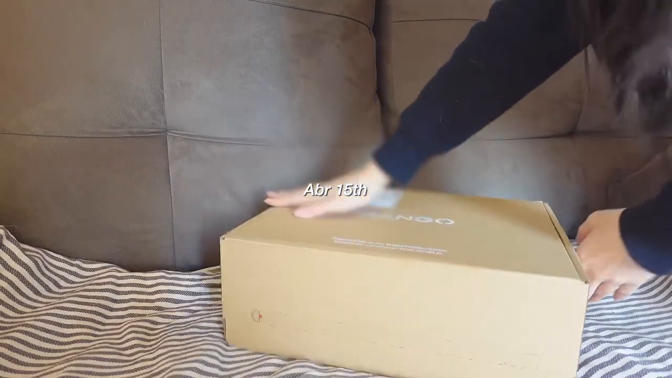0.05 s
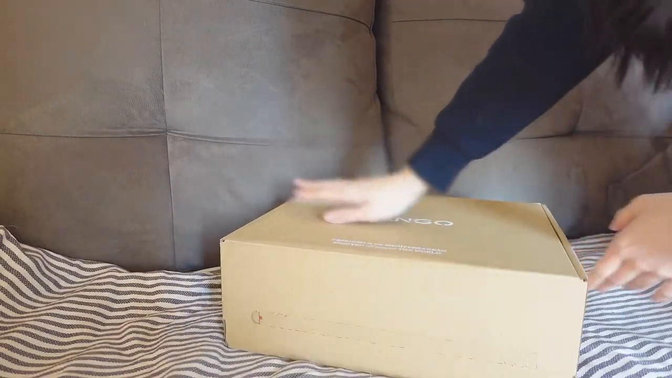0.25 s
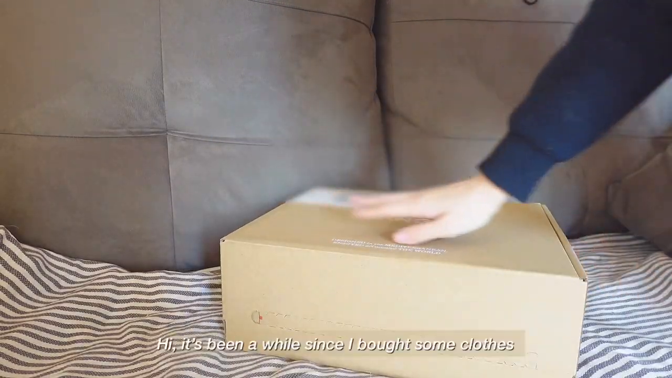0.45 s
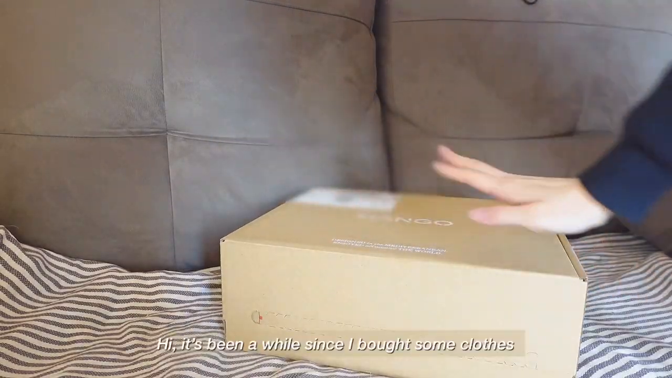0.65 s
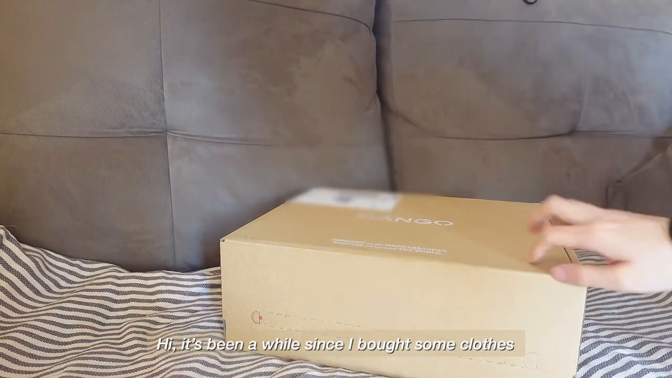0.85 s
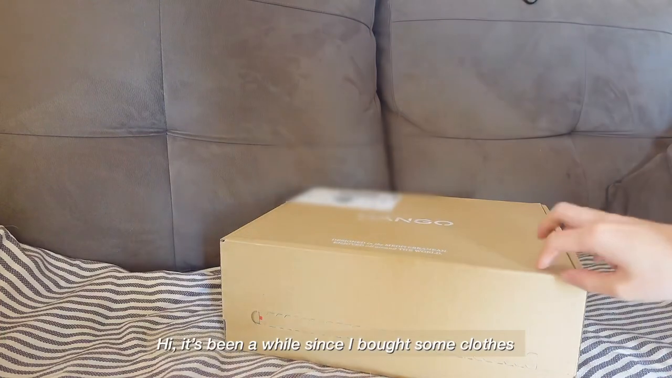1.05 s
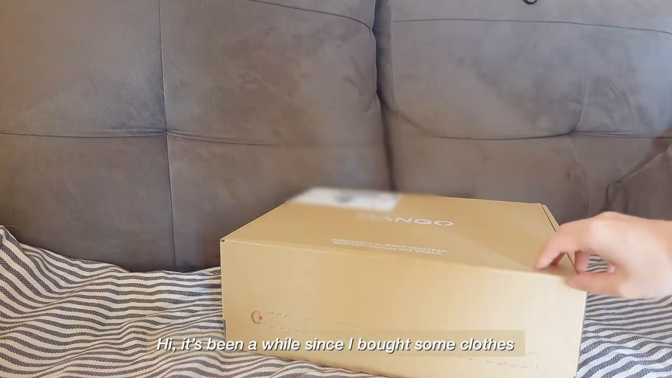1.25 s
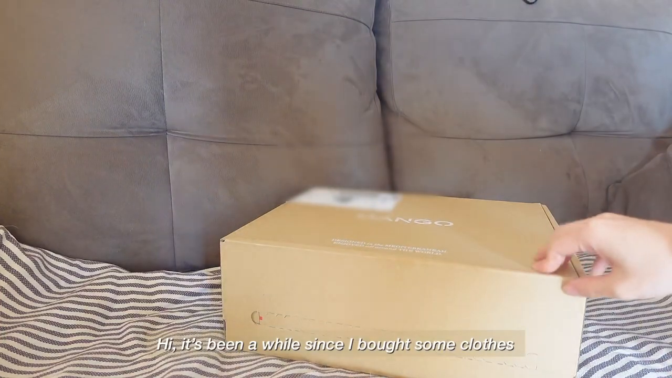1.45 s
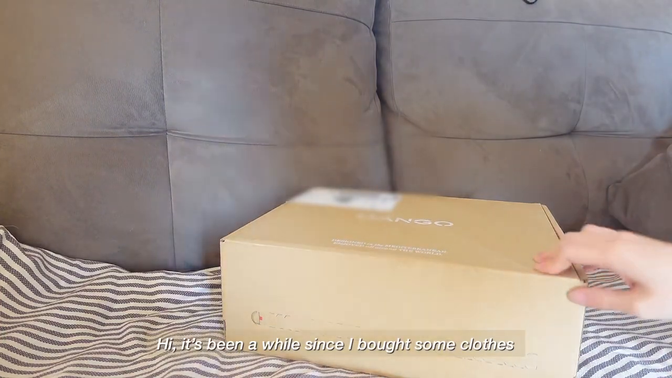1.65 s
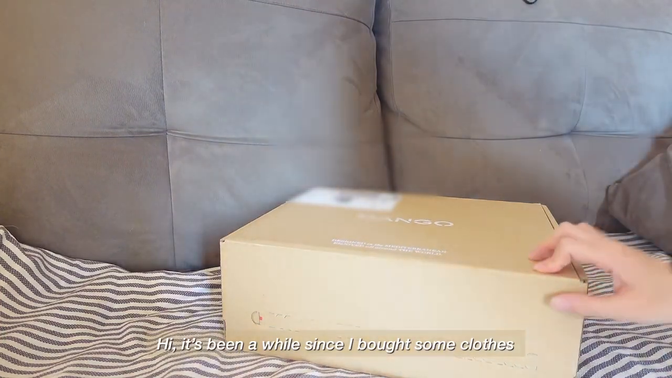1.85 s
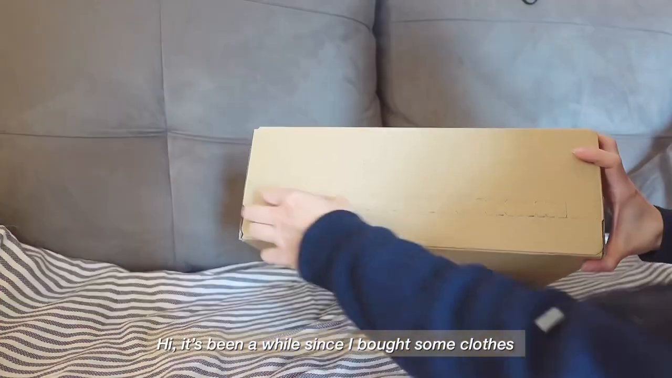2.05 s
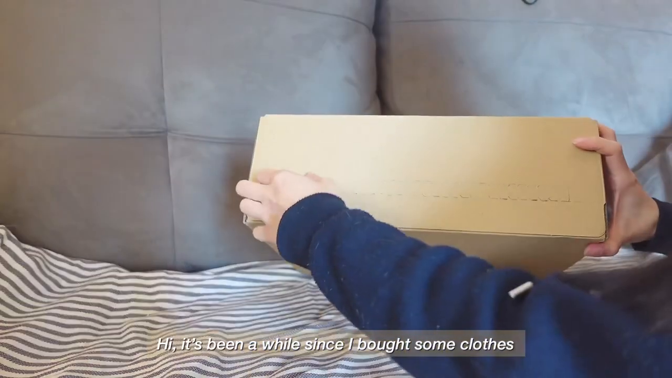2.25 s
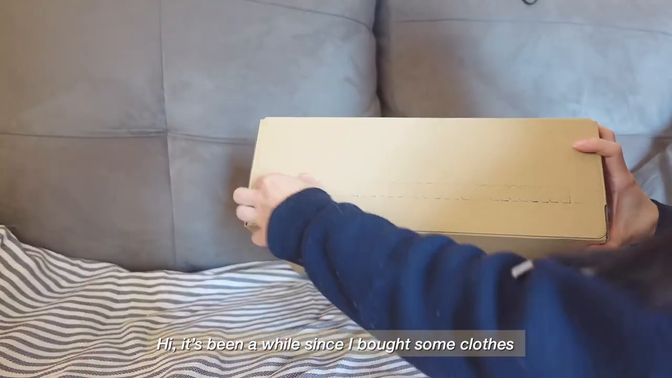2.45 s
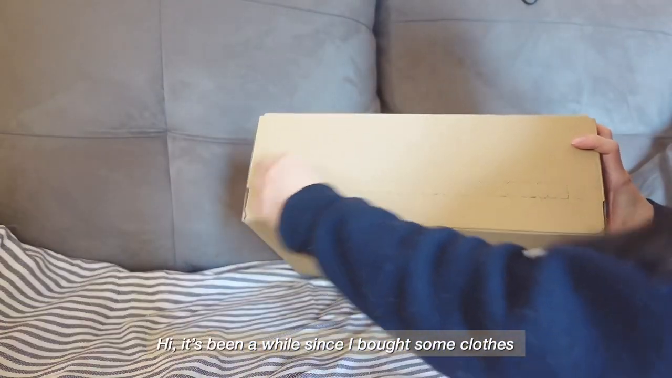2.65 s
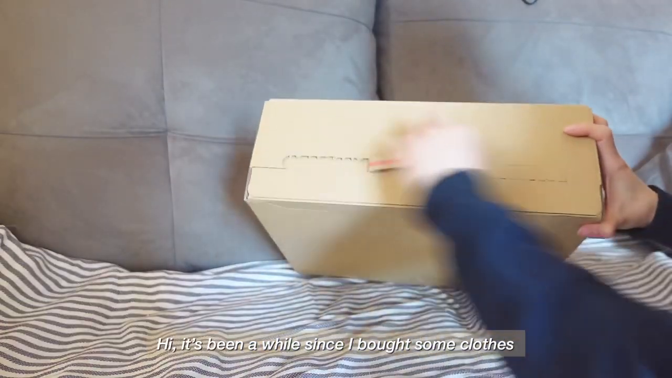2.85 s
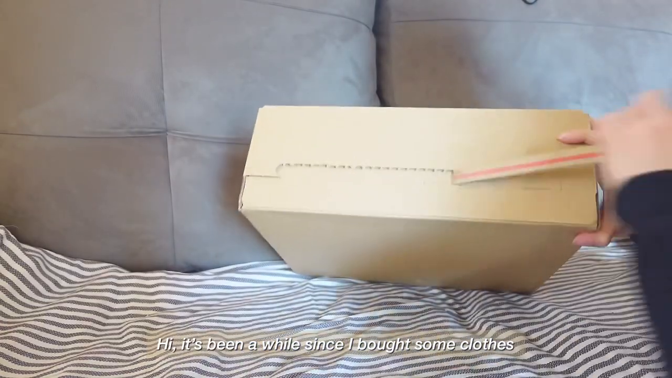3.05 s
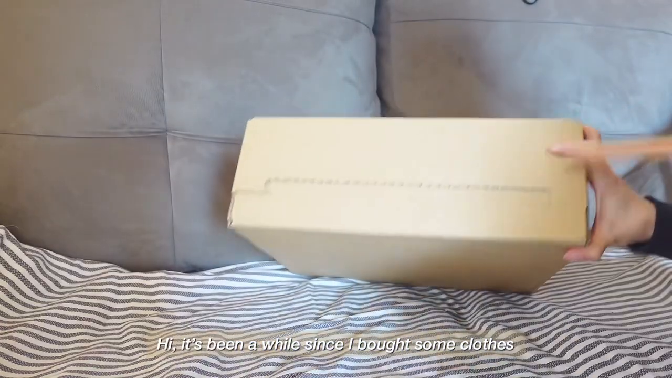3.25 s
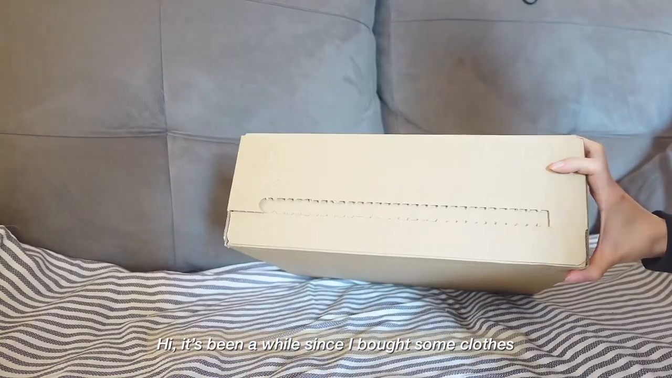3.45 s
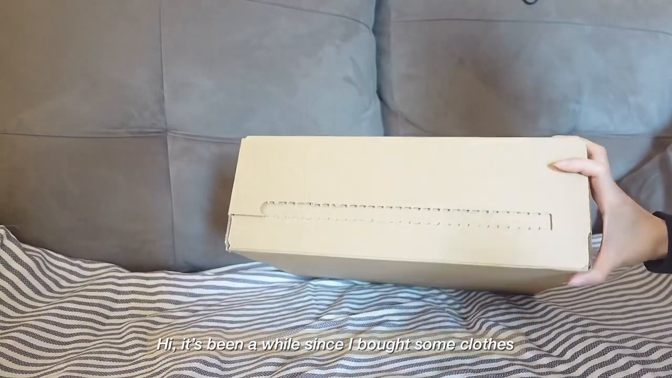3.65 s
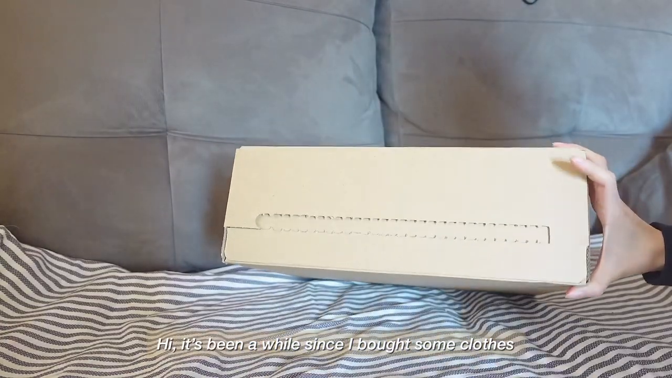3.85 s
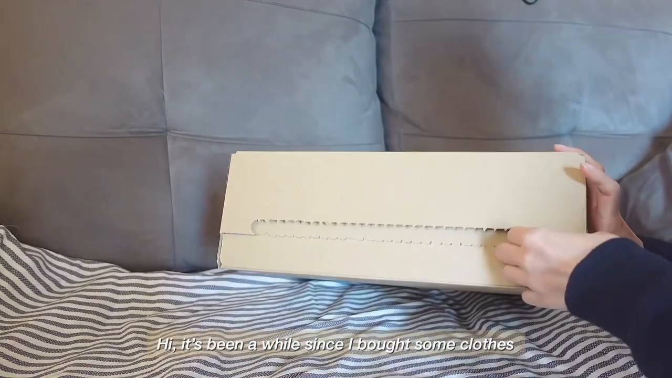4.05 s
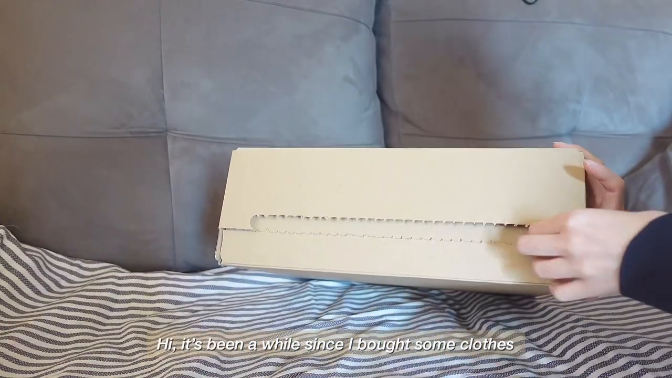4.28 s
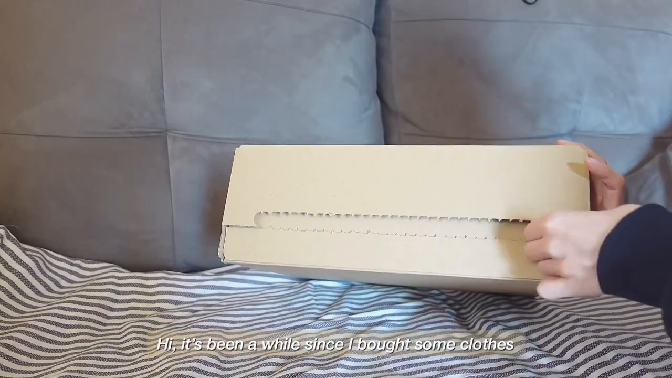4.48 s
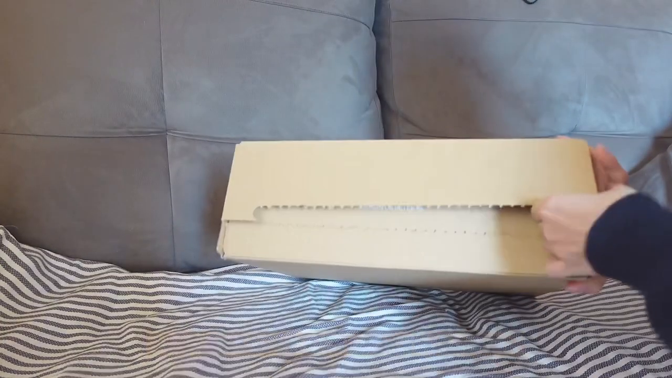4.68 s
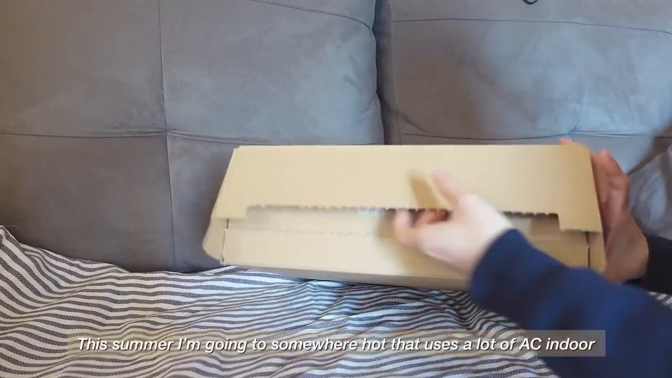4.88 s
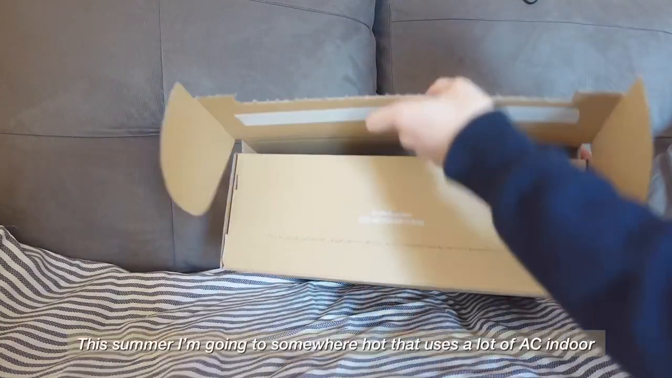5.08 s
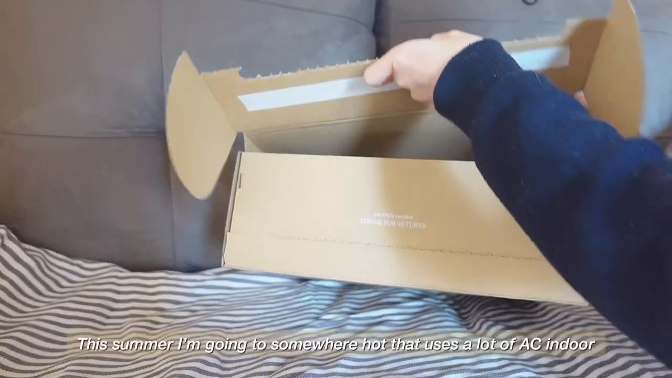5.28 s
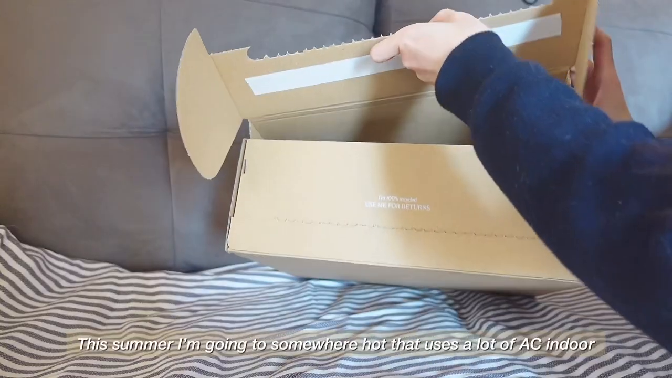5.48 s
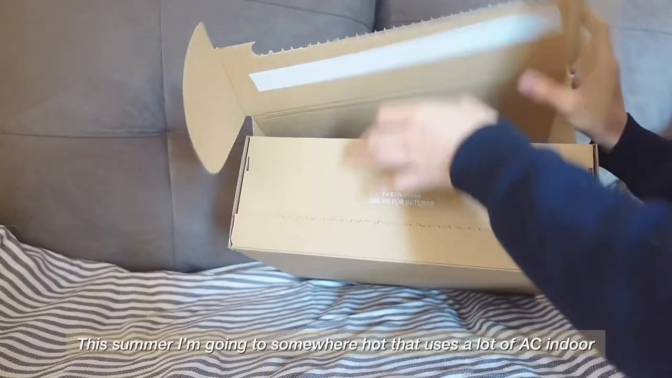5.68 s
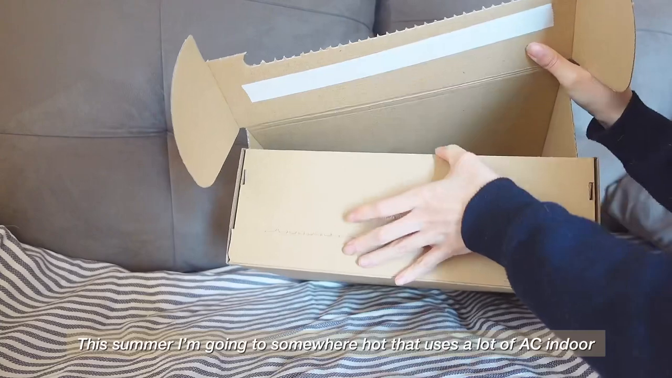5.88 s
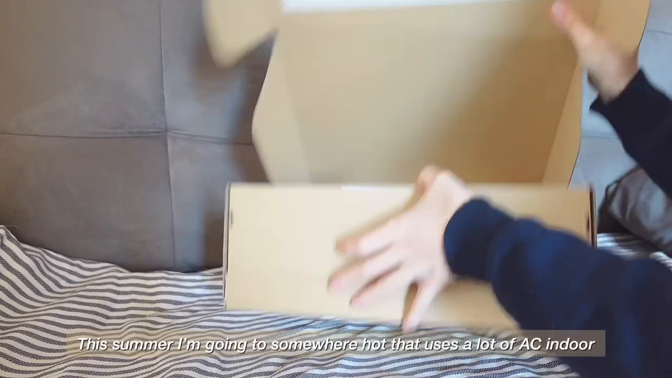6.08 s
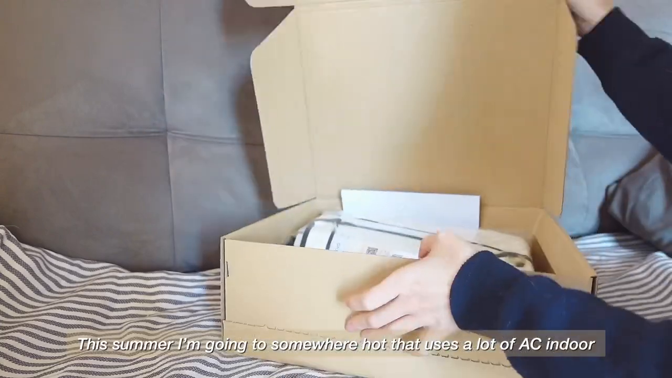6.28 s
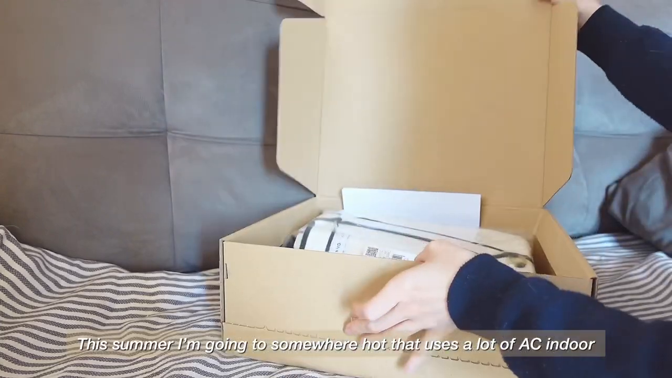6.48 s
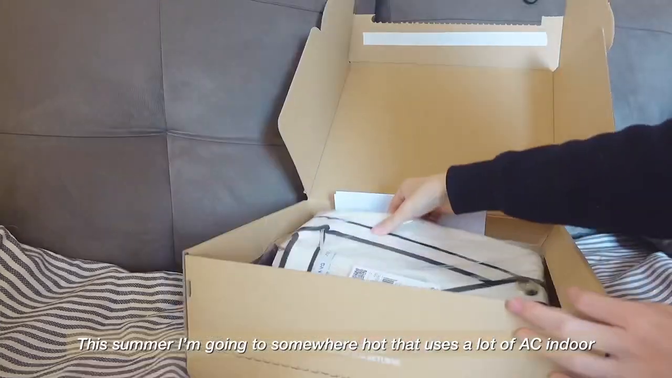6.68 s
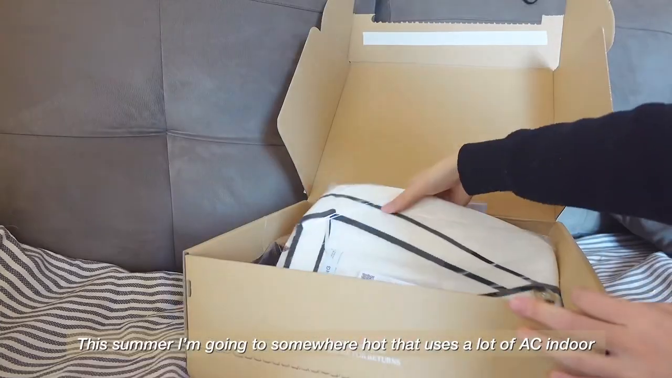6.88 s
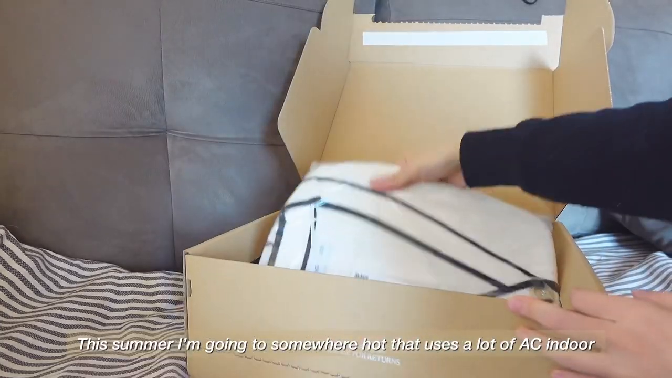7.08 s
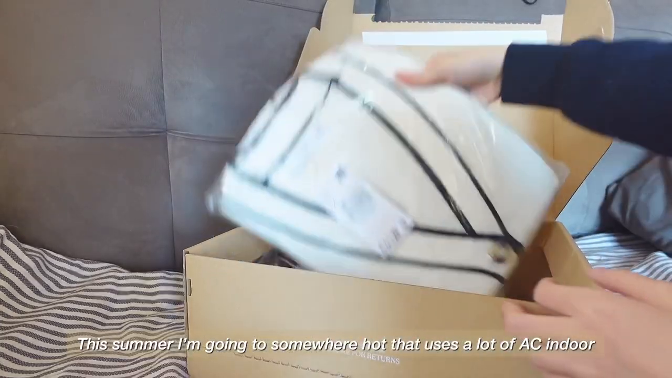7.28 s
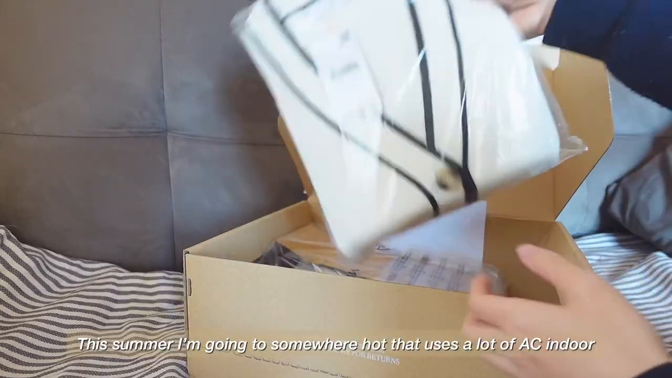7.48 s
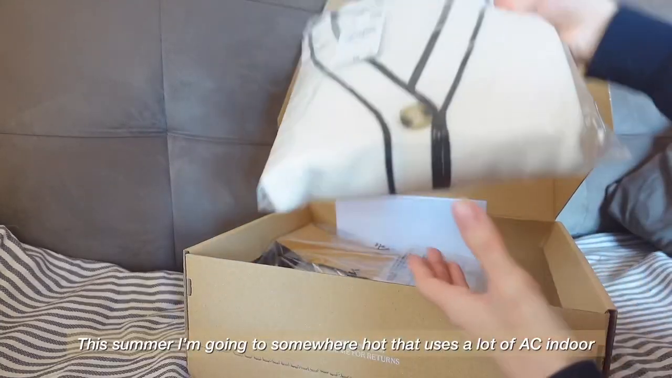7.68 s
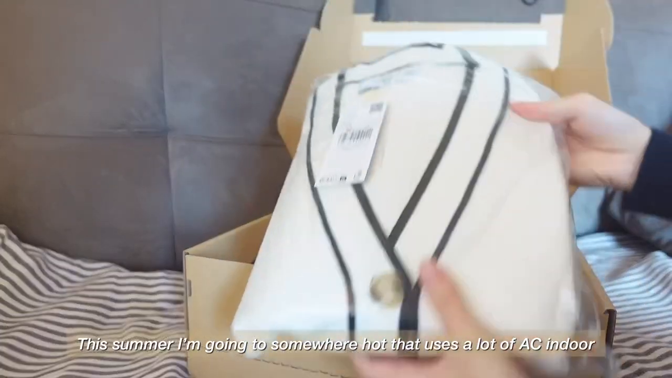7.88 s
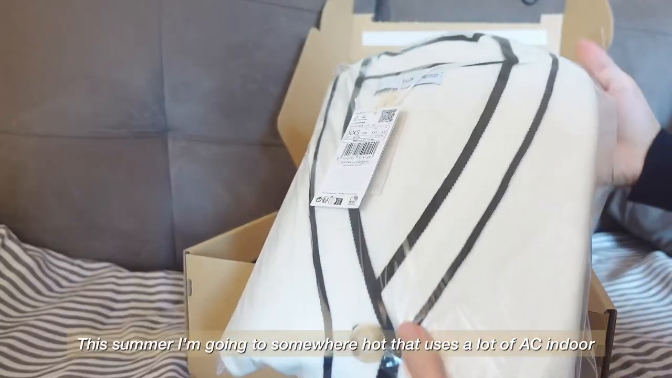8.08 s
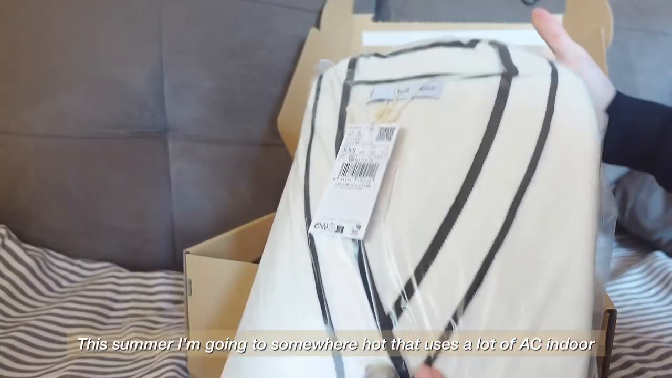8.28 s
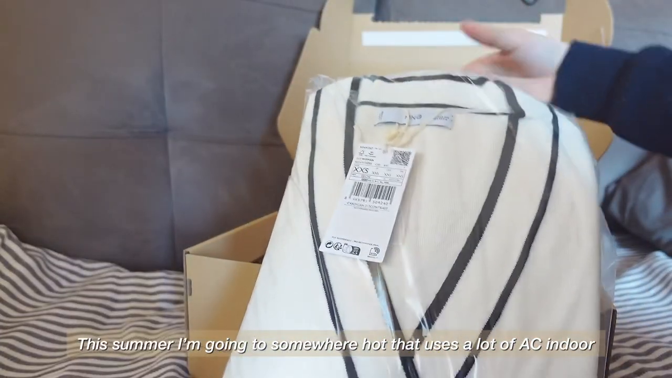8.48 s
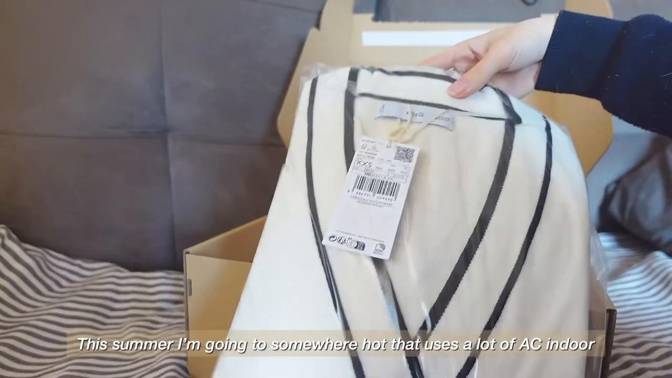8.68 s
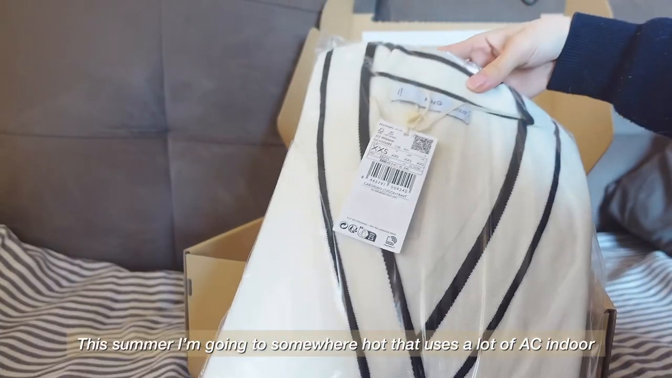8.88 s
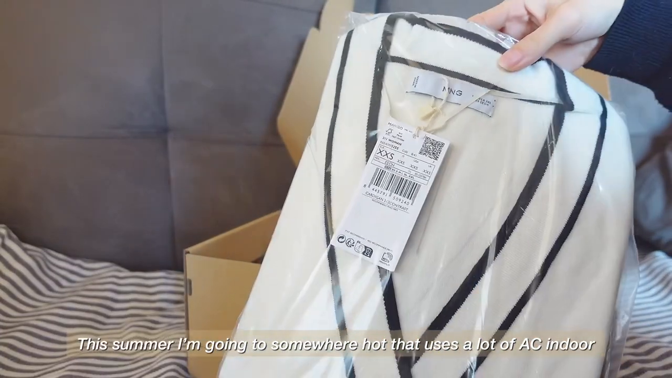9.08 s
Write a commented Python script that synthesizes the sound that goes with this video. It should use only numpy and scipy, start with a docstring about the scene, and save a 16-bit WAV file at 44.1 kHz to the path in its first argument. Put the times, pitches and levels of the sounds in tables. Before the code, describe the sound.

A close, nearly mono sound in a small live room with a faint steady house hush. At 0 s a palm rubs and taps a hollow cardboard box; grainy scuffs follow, with a scrape and low woody knocks around 0.8 to 1.2 s. Softer sliding continues, and a dull thump near 2.1 s marks the box being turned. From about 2.6 to 3.3 s a strip is torn off in one pull, a dense, loud run of crackling teeth ending in a sharp snap. A near-quiet gap follows. From 4 to 5 s the lid is pried with hard cracks, creaks and short scrapes; flaps scrape and pop open until about 6.4 s. From 6.7 s thin plastic crinkles, busiest around 7 to 7.4 s, with bright snaps and small box bumps near 7.6 s, then further bursts from 7.9 s, thinning to faint rustles around 9 s.

```python
"""On a sofa in a small live room, a cardboard mailer is patted, rubbed and turned over.
Its strip is torn off tooth by tooth in one pull; the lid is pried loose with sharp cracks and flaps scrape open.
Then a garment in a plastic bag is lifted out, crinkling. The microphone is close and nearly mono.
Tiny random slips, shaped in time and pitch, make the card and plastic; resonances ring the box and its panels.
Fading noise makes the room echoes, and steady noise the quiet of the house."""
import sys
import numpy as np
from scipy import signal
from scipy.fft import rfft, irfft, next_fast_len
from scipy.io import wavfile
from scipy.ndimage import uniform_filter1d, minimum_filter1d

SR = 44100
rng = np.random.default_rng(int(sys.argv[2]) if len(sys.argv) > 2 else 0)


def pcm_store(signal):
    """Save signal as 16-bit PCM."""
    levels = np.round(np.clip(np.atleast_2d(signal), -1, 1) * 32767)
    wavfile.write(sys.argv[1], SR, levels.astype(np.int16).T)


N = 402985

STRAIN_S = .006   # fibres give for this long before a break
TOOTH_HZ = 1740   # middle pitch of the small teeth and of the inner liner


def amp(db):
    """Turn decibels into a gain."""
    return 10 ** (np.asarray(db) / 20)


def rms_one(x):
    """Scale a lasting sound to rms 1."""
    return x / np.sqrt(np.mean(x ** 2) + 1e-20)


def energy_one(x):
    """Scale a short sound to energy 1."""
    return x / np.sqrt(np.sum(x ** 2) + 1e-20)


def at_hz(points, hz):
    """Read a table between its points, on a log-frequency axis."""
    f, value = np.transpose(points)
    return np.interp(np.log(np.maximum(hz, 1)), np.log(f), value)


def gains(rows):
    """Turn the dB columns of a curve into gains per sample, almost silent outside it."""
    s, *columns = np.transpose(rows)
    t = np.arange(N) / SR
    return [amp(np.interp(t, s, db, left=-120, right=-120)) for db in columns]


def add(track, s, sound):
    """Mix a sound into a track at a time in seconds."""
    at = max(round(s * SR), 0)
    track[at:at + len(sound)] += sound[:N - at]


def band(x, low_hz, high_hz, order=2):
    """Keep only the pitches between two edges."""
    sos = signal.butter(order, [low_hz, min(high_hz, .47 * SR)], "band", fs=SR, output="sos")
    return signal.sosfilt(sos, x + 1e-18)


def colour(x, spectrum):
    """Weight the pitches of a steady texture by a table of hz and dB; rms 1."""
    size = next_fast_len(N)
    weight = amp(at_hz(spectrum, np.fft.rfftfreq(size, 1 / SR)))
    return rms_one(irfft(rfft(x, size) * weight, size)[:N])


def wander(count):
    """Drift slowly by chance, with count new values a second."""
    values = np.clip(rng.normal(size=10 * count), -2, 2)
    return np.interp(np.arange(N) / SR * count, np.arange(10 * count), values)


def grains(size, per_s, spread_db):
    """Random tiny slips, mostly faint and a few strong; rms 1."""
    strength = amp(spread_db * np.minimum(rng.exponential(1, size), 4.5))
    happens = rng.random(size) < per_s / SR
    return rms_one(happens * strength * rng.choice([-1, 1], size))


def swells(rows):
    """Each hand movement swells and fades; one gain per sample for every dB column."""
    shape = 2.8   # 2 is a bell; lower is more pointed
    t = np.arange(0, N, 32) / SR
    power = 0
    for s, length_s, *db in rows:
        # at half a length from the middle, the power is down to 1/e
        swell = np.exp(-np.abs(2 * (t - s) / length_s) ** shape)
        power = power + np.outer(amp(db) ** 2, swell)
    return [np.interp(np.arange(N) / SR, t, np.sqrt(p)) for p in power]


def house_quiet():
    """The faint steady noise of the house, partly shared by the two sides."""
    # colour of the quiet: pitch_hz, level_db (relative)
    quiet_colour = [(30, -58.5), (115, -10.5), (153, -15.5), (311, -15), (374, -17.5), (426, -19),
                    (499, -19), (1540, -21.5), (5000, -35.5), (16000, -43.5)]
    air = rng.standard_normal(N) + 0.79 * rng.standard_normal((2, N))
    return amp(-55) * np.array([colour(side, quiet_colour) for side in air])


def room(x):
    """Wall echoes arrive after a short gap and die band by band, almost alike on both sides."""
    # time for the echoes to fall by 60 dB: pitch_hz, fall_s
    fall_times = [(100, 1.35), (260, 0.52), (700, 0.33), (1800, 0.53), (5000, 0.4), (13000, 1.01)]
    # starting strength of the echoes: pitch_hz, level_db (relative)
    tone = [(100, 1.5), (250, 5.5), (700, 7), (2000, 2.5), (5000, 5), (13000, -4.5)]
    first_echo_s = 0.0099
    t = np.arange(int(.8 * SR)) / SR
    edges = np.geomspace(60, 17000, 13)
    white, tail = rng.standard_normal((2, 2, len(t))), 0
    for k, (low, high) in enumerate(zip(edges, edges[1:])):
        hz = np.sqrt(low * high)
        dying = amp(at_hz(tone, hz) - 60 * t / at_hz(fall_times, hz))
        # neighbouring bands use different noise
        tail = tail + band(white[k % 2] * (t > first_echo_s), low, high) * dying
    mid, side = energy_one(tail[0]), amp(-14) * energy_one(tail[1])
    return signal.fftconvolve(x[None], np.array([mid + side, mid - side]), axes=1)[:, :N]


def box(push):
    """The hollow box rings in its low modes, differently as the hands move over it; the deepest hardly radiate."""
    # panels and air of the box: pitch_hz, level_db (relative), fall_s (time to fall by 60 dB)
    modes = [(75, -14, .2), (108, -12, .25), (168, -4, .22), (190, -3, .18), (248, 1.5, .22),
             (300, -1, .12), (350, -2, .08), (490, -1, .07), (590, -2, .08)]
    out = 0
    for k, (hz, db, t60) in enumerate(modes):
        r, w = amp(-60 / (t60 * SR)), 2 * np.pi * hz / SR
        place = amp(db + 1.5 * wander(9))
        ring = signal.lfilter([0, np.sin(w)], [1, -2 * r * np.cos(w), r * r], place * push + 1e-18)
        out = out + (-1) ** k * ring
    return band(out, 110, 1300)


def panels(x):
    """The stiff panels ring briefly at narrow resonances, each with its own gain at its peak."""
    # notes of the panels: pitch_hz, gain_db, fall_s (time to fall by 60 dB)
    notes = [(531, 2, 0.16), (667, 2, 0.019), (945, -3.5, 0.12), (1040, -1, 0.13), (1490, -1.5, 0.021),
             (1718, 7.5, 0.16), (2220, 4.5, 0.02), (3140, -2, .02)]
    out = 0
    for hz, db, t60 in notes:
        r, w = amp(-60 / (t60 * SR)), 2 * np.pi * hz / SR
        ring = signal.lfilter([1, 0, -1], [1, -2 * r * np.cos(w), r * r], x + 1e-18)
        out = out + amp(db) * (1 - r * r) / 2 * ring
    return out


def rubbing():
    """Sliding contact: grainy board with small scuffs, smooth skin hiss, and a low murmur from the box."""
    # strokes of palms and flaps: middle_s, length_s, board_db, skin_hiss_db (relative)
    strokes = [(0.0, 0.21, -29, -41), (0.27, 0.73, -57, -53.5), (0.545, 0.11, -38, -42.5),
               (0.95, 0.23, -35, -45), (1.3, 0.1, -43, -57), (1.45, 0.18, -47.5, -47),
               (1.735, 0.17, -57, -47.5), (2.05, 0.091, -34.5, -48.5), (2.25, 0.23, -37, -51.5),
               (2.54, 0.21, -37.5, -41), (3.49, 0.1, -56, -49.5), (4.09, 0.16, -32, -41.5),
               (4.39, 0.14, -36.5, -47.5), (4.76, 0.28, -32.5, -43.5), (5.06, 0.13, -29, -37),
               (5.28, 0.14, -31, -40), (5.54, 0.17, -36, -43.5), (5.91, 0.79, -42.5, -51.5),
               (6.26, 0.11, -33.5, -38.5), (6.6, 0.12, -39.5, -46.5)]
    # the box rocks on the cushions: middle_s, length_s, level_db
    rockings = [(0.0, 0.068, -38), (0.62, 0.33, -51.5), (1.5, 0.059, -48), (2.2, 0.48, -50),
                (4.83, 0.096, -43.5), (5.97, 1, -50), (7.13, 0.14, -48.5), (7.27, 0.1, -44.5),
                (7.53, 0.11, -46), (7.64, 0.064, -34.5), (7.93, 0.13, -42.5)]
    # colours of rubbed board and of skin: pitch_hz, level_db (relative)
    board_colour = [(180, -21), (300, -3.5), (494, 0.5), (822, -1), (1100, 1.5), (1940, -1), (2280, -1),
                    (4000, -17), (5200, -51), (8800, -120)]
    skin_colour = [(1410, -24), (2400, -0.5), (3770, 1.5), (5700, -2.5), (6220, -2.5), (13900, -18.5),
                   (16000, -25)]
    board, skin = swells(strokes)
    # fingers catch about 90 times a second
    scuffs = amp(-12.5) * grains(N, 90, 1.0)
    slips = grains(N, 2500, 2.1) + scuffs
    # the dragged panels creak in spells
    slips = slips + amp(-4) * panels(amp(4.4 * wander(14)) * slips)
    board_slide = amp(-3.5) * board * colour(slips, board_colour)
    skin_hiss = amp(2.5) * skin * colour(grains(N, 12000, 3.5), skin_colour)
    murmur = rms_one(band(box(rng.standard_normal(N)), 83, 400))
    return board_slide + skin_hiss + swells(rockings)[0] * murmur


def scrapes():
    """An edge sticks and slips under a quickly swelling stroke, sounding the note of the panel that it drags over."""
    # board edges scraping on each other: start_s, length_s, level_db (relative), pitch_hz,
    # hiss_db (relative to the board sound)
    rows = [(0.822, 0.076, -27, 900, -7), (1.867, 0.048, -33.5, 1940, -11), (1.997, 0.023, -44, 1200, -8),
            (2.237, 0.0089, -33, 1990, -8), (2.278, 0.0094, -37, 1200, -13), (2.374, 0.0062, -36, 3000, -6),
            (2.616, 0.016, -35, 1700, 4), (2.706, 0.019, -23, 1090, -8), (3.977, 0.071, -21.5, 1440, -7),
            (4.557, 0.018, -17, 2300, -18), (4.576, 0.07, -23.5, 1280, -7.5),
            (4.764, 0.046, -21, 1670, -4.5), (4.807, 0.05, -26, 1690, -14), (4.891, 0.078, -27.5, 1840, -2),
            (4.957, 0.051, -22.5, 1720, -0.5), (5.403, 0.014, -34, 1480, -14),
            (5.596, 0.031, -23.5, 1540, -6.5), (5.629, 0.022, -26.5, 1650, -4.5),
            (5.731, 0.11, -22.5, 1250, -14.5), (6.024, 0.045, -15, 1370, -14.5),
            (6.053, 0.11, -20.5, 1580, -2), (6.126, 0.12, -26, 1840, -2.5)]
    out = np.zeros(N)
    for s, length_s, db, hz, hiss_db in rows:
        size = int(length_s * SR)
        slips = grains(size, 2200, 1.8) * signal.windows.tukey(size, .6)
        broad = rms_one(band(band(slips, hz / 2.4, hz * 2.1, order=1), 330, 3200))
        note = rms_one(band(slips, hz / 1.1, hz * 1.1, order=1))
        hiss = rms_one(band(band(slips, 4900, 13300), 3600, 4950, order=1))
        board = rms_one(broad + 0.32 * note)
        add(out, s, amp(db - 3.5) * (board + amp(hiss_db) * hiss))
    return out


def fracture(hz, low_hz, crack_db, decay_s, lead):
    """Fibres give, then one sharp break and a dying burst, heard as a panel note and a bright crack."""
    t = np.arange(2048) / SR - STRAIN_S   # the break is at zero
    giving = amp(-8.5) * np.exp(-np.abs(t) / 0.0013)
    dying = np.exp(-np.abs(t) / decay_s)
    burst = grains(len(t), 9000, 1.7) * np.where(t < 0, giving, dying)
    burst[round(STRAIN_S * SR)] += lead * np.sqrt(np.sum(burst ** 2))
    # higher notes die sooner
    note = energy_one(np.sin(2 * np.pi * hz * t) * (t > 0) * np.exp(-np.abs(t) * np.sqrt(hz) / 0.073))
    panel = band(burst, np.clip(low_hz, 50, 2500), 3340)
    panel = energy_one(band(panel, np.clip(0.52 * low_hz, 50, 2500), 2800, order=1))
    crack = energy_one(band(band(burst, 3040, 9600), 3750, 6500, order=1))
    # each broken flake has a note of its own
    flake_hz = 5200 * np.exp(0.28 * np.clip(rng.normal(), -2, 2))
    flake = energy_one(band(burst, flake_hz / 1.25, flake_hz * 1.3, order=1))
    body = band(amp(-2.5) * note + panel, np.clip(0.55 * low_hz, 50, 2500), 4700)
    return energy_one(body) + amp(crack_db) * energy_one(crack + amp(-4.0) * flake)


def knocks():
    """Fingers tap the box and glued flaps crack loose; returns the direct sound and what each throws into the room."""
    # knocks and cracks of the board: break_s, level_db (relative), pitch_hz, low_edge_hz (a guide for
    # the filters), crack_db, thump_db (relative), decay_s (shortened below), room_db (relative)
    rows = [(0.0071, -25.5, 1030, 150, -12, 3, 0.0068, -22),
            (0.053, -19, 2010, 400, -21, -9.5, 0.0041, -14), (0.769, -42.5, 660, 150, -10, 17, 0.0033, -3),
            (0.781, -27.5, 760, 150, -14.5, 7.5, 0.0037, -6.5),
            (0.9285, -24.5, 640, 150, -31, -28, 0.0059, 1),
            (0.9374, -17.5, 600, 170, -21, 0.5, 0.0056, -10.5),
            (1.037, -24.5, 1470, 450, -15, -5, 0.0046, -5),
            (1.146, -17.5, 627, 280, -17.5, -2.5, 0.0044, -5),
            (2.078, -22, 503, 150, -15.5, -5.5, 0.023, -6.5),
            (2.402, -30.5, 2070, 447, 1, -38, 0.0049, -13),
            (2.488, -24.5, 2450, 1320, -9, -34, 0.0014, -12),
            (2.599, -21.5, 2800, 990, -3.5, -28, 0.0011, -18),
            (2.631, -13.5, 2050, 250, -3.5, -25, 0.0037, -11),
            (2.72, -21.5, 1210, 250, -7.5, -7, 0.0068, -24), (3.2479, -12.5, 1730, 302, -8, -9, 0.0086, -5),
            (3.287, -24.5, 2230, 614, 0.5, -24, 0.0023, -13),
            (3.966, -16.5, 2300, 450, -10.5, -12.5, 0.0062, -0.5),
            (4.1152, -13.5, 1520, 298, -19, -17, 0.0078, -10.5),
            (4.2005, -14.5, 2120, 1710, -14.5, -16, 0.0077, -8.5),
            (4.234, -22.5, 1920, 443, -14, -15, 0.0012, -8), (4.245, -27, 2320, 300, -9.5, 1, 0.0052, -4.5),
            (4.363, -32.5, 2280, 400, -7, -6, 0.0064, -17), (4.518, -35, 637, 300, -8, -7, 0.012, -13),
            (4.5666, -20, 2530, 1330, -10.5, -11, 0.011, -7),
            (4.575, -14, 1070, 500, -7, -20, 0.0012, -9.5), (4.579, -21.5, 625, 305, -12, 0.5, 0.0052, -4),
            (5.0091, -14, 1580, 800, -14, -20, 0.0031, -10),
            (5.7104, -22.5, 2240, 350, -0.5, -4, 0.0059, -1.5),
            (5.7359, -11.5, 1010, 450, -14, -9, 0.0021, -9),
            (6.037, -21.5, 1160, 507, -5.5, -0.5, 0.0057, 7),
            (6.1049, -13, 1620, 243, -12, -5.5, 0.006, -16), (6.209, -21, 1020, 200, -23, 2, 0.0052, -10),
            (6.4401, -37, 1420, 400, -4, -25, 0.0046, -13), (7.653, -30.5, 950, 200, 6, -3, 0.009, -15),
            (9.005, -36.5, 1190, 298, 0, -32, 0.0016, -28)]
    direct, thrown, push = np.zeros((3, N))
    for s, db, hz, low_hz, crack_db, thump_db, decay_s, room_db in rows:
        sound = amp(db + 26.5) * fracture(hz, low_hz, crack_db, 0.77 * decay_s, lead=0.39)
        add(direct, s - STRAIN_S, sound)
        add(thrown, s - STRAIN_S, amp(room_db) * sound)
        add(push, s, amp(db + thump_db - 5.5) * np.ones(1))
    thump = box(push)
    ringing = amp(-13) * panels(direct)
    return direct + thump + ringing, thrown + amp(-13) * thump


def creases(per_s, spread_db):
    """Each buckle rings a few narrow notes of the film for some cycles; the notes come in spells; rms 1."""
    sharpness, spell_db = 12, 2   # higher sharpness is narrower; how much each note comes and goes
    share = .22                   # chance that a buckle rings a given note
    out, buckles, width = 0, grains(N, per_s, spread_db), 1 + .5 / sharpness
    for hz in np.geomspace(600, 15000, 30):
        struck = buckles * (rng.random(N) < share) * amp(spell_db * wander(32))
        out = out + band(struck, hz / width, hz * width, order=1)
    return rms_one(out)


def bag():
    """Thin film buckles in clusters of small creases, with some loud, short snaps."""
    # grips that crumple the plastic bag: middle_s, length_s, film_db, fizz_db (relative)
    crumples = [(6.66, 0.057, -46, -37.5), (6.87, 0.35, -34.5, -43.5), (7.04, 0.054, -33, -37),
                (7.13, 0.14, -30.5, -40), (7.265, 0.11, -32, -37.5), (7.47, 0.49, -40.5, -46.5),
                (7.655, 0.1, -34.5, -48.5), (7.93, 0.23, -32.5, -38), (8.07, 0.11, -40.5, -40.5),
                (8.2, 0.11, -31.5, -36.5), (8.315, 0.073, -35, -40), (8.47, 0.14, -39, -38),
                (8.65, 0.072, -38, -38.5), (8.76, 0.19, -39, -55), (8.91, 0.12, -55, -45),
                (9.035, 0.07, -47, -39.5), (9.13, 0.023, -62, -37.5)]
    # single creases snapping: start_s, peak_db, pitch_hz
    snaps = [(6.7382, -20, 4500), (6.8024, -15.5, 2400), (7.018, -17, 2540), (7.052, -17, 4930),
             (7.115, -14, 2300), (7.243, -12.5, 2370), (7.255, -15, 2600), (7.2908, -14, 6200),
             (7.3667, -18, 3450), (7.9385, -12.5, 3030), (8.036, -22, 6200), (8.1469, -19, 4230),
             (8.166, -27, 2020), (8.2005, -20, 3000), (8.328, -20, 4740), (8.503, -18, 2830),
             (8.708, -16.5, 9400), (8.7393, -16.5, 2860), (8.7553, -14, 4030), (8.8045, -24, 3300),
             (8.82, -22, 6240), (8.904, -16, 2420), (8.955, -21, 2130)]
    # colours of the film and of its bright fizz: pitch_hz, level_db (relative)
    film_colour = [(180, -19), (300, -2), (366, -2), (700, -9.5), (1470, -1.5), (2300, 1), (4600, -9),
                   (6500, -16), (11000, -23), (16000, -70)]
    fizz_colour = [(2650, -20.5), (4500, -8.5), (10500, -16.5), (14900, -25.5), (16000, -28)]
    film, fizz = swells(crumples)
    clusters = amp(1.5 * rms_one(band(rng.standard_normal(N), 15, 70)))
    crinkle = clusters * (creases(750, 3.6) + .55 * grains(N, 1800, 2.5))
    out = amp(-4.3) * film * colour(crinkle, film_colour) + amp(1.4) * fizz * colour(crinkle, fizz_colour)
    t = np.arange(1024) / SR
    for s, db, hz in snaps:
        burst = grains(len(t), 9000, 2.4) * (1 - np.exp(-t / 0.0003)) * np.exp(-t / 0.002)
        snap = band(band(burst, hz / 1.65, hz * 1.42, order=1), 730, 10400, order=1)
        add(out, s, amp(db) * snap / np.abs(snap).max())
    return out


def all_teeth():
    """The strong teeth, and smaller ones that give way unevenly between them."""
    # strong teeth of the strip: break_s, level_db (relative), pitch_hz
    strong = [(2.7479, 7.2, 670), (2.761, 6, 450), (2.785, 8.5, 2190), (2.806, 13, 1800), (2.83, 6.7, 620),
              (2.857, 11, 1750), (2.896, 6.5, 1670), (2.908, 9.5, 1650), (2.97, 11.6, 510), (3, 16, 515),
              (3.014, 10, 2160), (3.026, 10.6, 2180), (3.057, 9.5, 660), (3.086, 14, 485), (3.102, 16, 530),
              (3.129, 7.6, 530), (3.144, 10, 1600), (3.159, 7.7, 540), (3.203, 8.5, 1720),
              (3.223, 10.5, 2120)]
    teeth_per_s, jitter_s = 72, .002
    small_db, spread_db = 4.5, 1
    small = []
    for (s, _, _), (next_s, _, _) in zip(strong, strong[1:]):
        steps = max(round((next_s - s) * teeth_per_s), 1)
        chance = np.clip(rng.normal(size=(8, 3)), -2, 2)
        for k, (late, strength, pitch) in zip(range(1, steps), chance):
            break_s = s + (next_s - s) * k / steps + jitter_s * late
            small.append((break_s, small_db + spread_db * strength, TOOTH_HZ * np.exp(.4 * pitch)))
    return list(strong) + small


def tear():
    """Each tooth of the strip breaks in two liners and plucks the box; fibres crackle in clumps between."""
    # the pull on the strip, a curve: time_s, fibres_db, box_rumble_db (relative)
    pull = [(2.64, -22.5, -40), (2.7, -37, -22), (2.76, -19, -29.5), (2.87, -19.5, -26), (2.97, -17, -28.5),
            (3.1, -20.5, -20.5), (3.22, -19.5, -29), (3.29, -20.5, -51), (3.37, -35.5, -55.5)]
    # colour of the tearing fibres: pitch_hz, level_db (relative)
    fibre_colour = [(240, -29), (400, 1), (520, -3), (839, -5.5), (1710, -4), (2250, -7), (2510, -8.5),
                    (5350, -10.5), (10400, -17.5), (16000, -30)]
    rip_db, crack_db, decay_s = -1.5, -5.5, 0.0032
    inner_lag_s, inner_db = .004, -5.5   # the inner liner breaks just after the outer one
    teeth, push = np.zeros((2, N))
    fibre_gain, rumble = gains(pull)
    for s, db, hz in all_teeth():
        lag, pitch, crack, sign = np.clip(rng.normal(size=4), -2, 2)
        outer = fracture(hz, 300, crack_db + 4.8 * crack, decay_s, lead=0.3)
        inner_hz = TOOTH_HZ * np.exp(.4 * pitch)
        inner = fracture(inner_hz, 640, crack_db - 2.6 * crack, decay_s / 2, lead=0.46)
        outer_s = s - STRAIN_S
        add(teeth, outer_s, amp(rip_db + db) * outer)
        add(teeth, outer_s + inner_lag_s * np.exp(.5 * lag), amp(rip_db + db + inner_db) * inner)
        add(push, s, np.sign([sign]))
    clumps = amp(2.0 * rms_one(band(rng.standard_normal(N), 22, 110)))
    fibres = amp(-3.5) * fibre_gain * colour(clumps * grains(N, 2000, 2.6), fibre_colour)
    return teeth + amp(0.5) * box(rumble * push) + fibres + amp(-4.5) * panels(teeth + fibres)


def scene():
    """All the handling, its echoes and the quiet of the house."""
    knocked, thrown = knocks()
    torn, scraped, rubbed, plastic = tear(), scrapes(), rubbing(), bag()
    to_room = thrown + amp(-17.5) * torn + amp(-10.5) * scraped + amp(-17.5) * rubbed + amp(-7) * plastic
    sound = knocked + torn + scraped + rubbed + plastic + amp(-1.5) * room(to_room)
    # the middle range reaches the right side a little more strongly
    lean = .055 * band(sound, 160, 2000, order=1) * np.array([[-1], [1]])
    return sound + lean + house_quiet()


def record(dry):
    """A fast limiter holds the loudest peaks; the top is cut."""
    ceiling, cutoff_hz = .72, 16000
    over_db = 20 * np.log10(np.maximum(np.abs(dry).max(axis=0) / ceiling, 1))
    recovery = 1500 * np.arange(N) / SR   # the level recovers at 1500 dB per second
    held = np.maximum.accumulate(over_db + recovery) - recovery
    gain = uniform_filter1d(minimum_filter1d(amp(-held), size=45), size=45)
    return signal.sosfilt(signal.ellip(10, .2, 80, cutoff_hz, fs=SR, output="sos"), dry * gain)


dry = scene()
out = record(dry)
pcm_store(out)
```